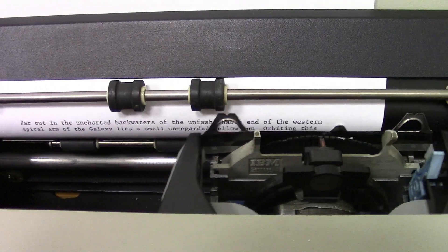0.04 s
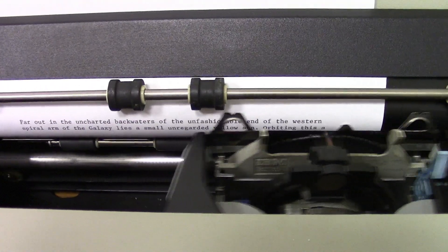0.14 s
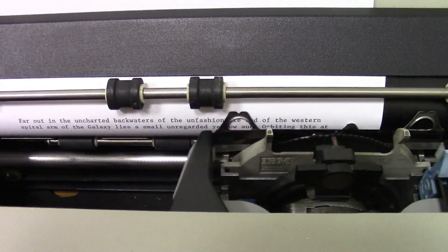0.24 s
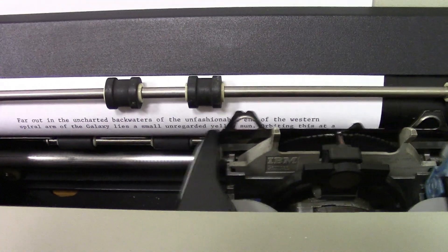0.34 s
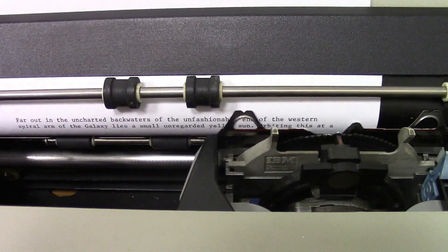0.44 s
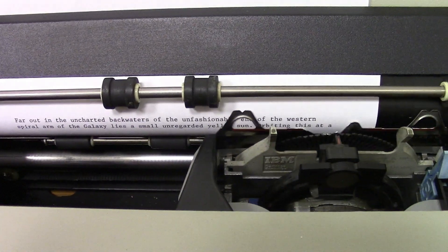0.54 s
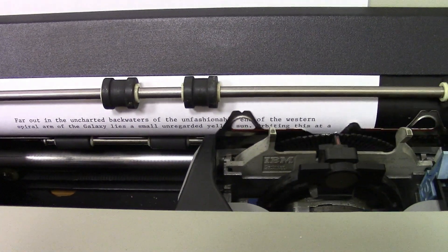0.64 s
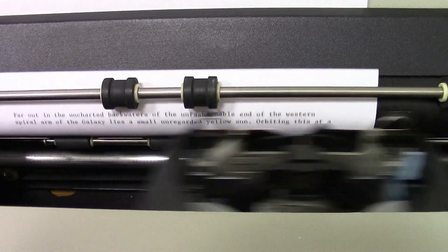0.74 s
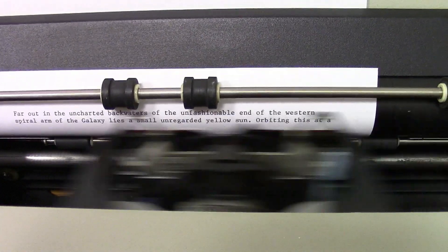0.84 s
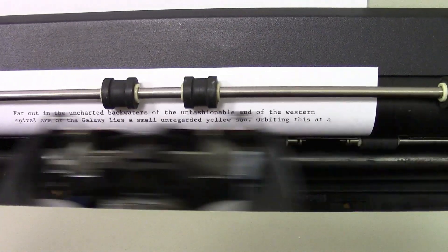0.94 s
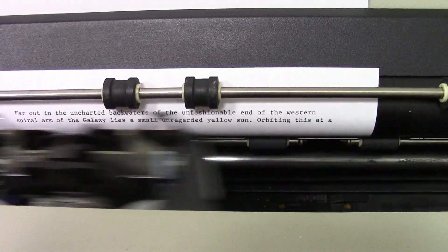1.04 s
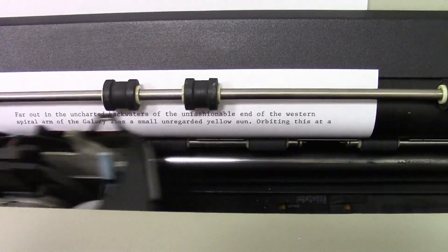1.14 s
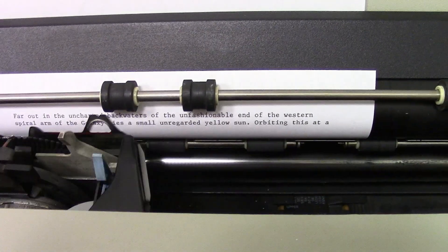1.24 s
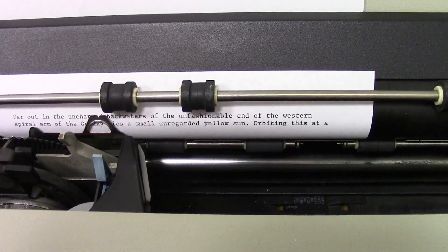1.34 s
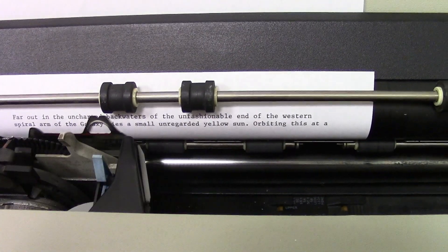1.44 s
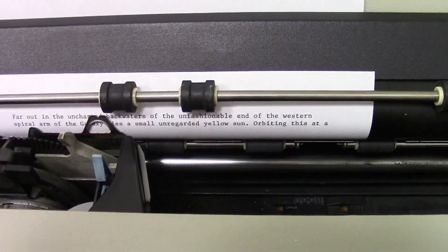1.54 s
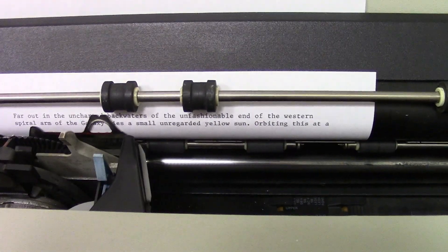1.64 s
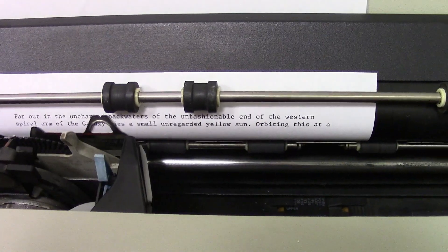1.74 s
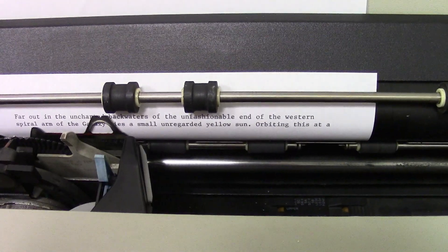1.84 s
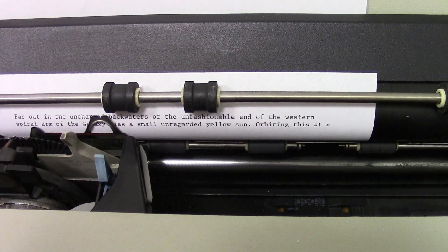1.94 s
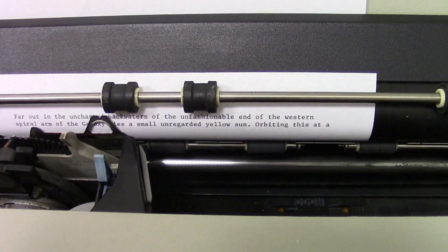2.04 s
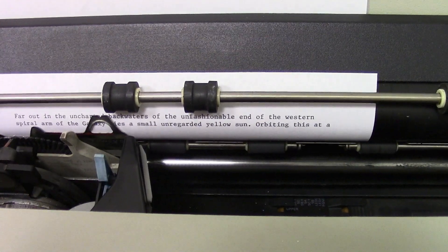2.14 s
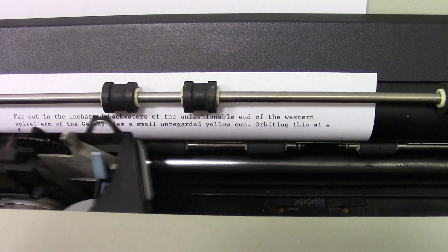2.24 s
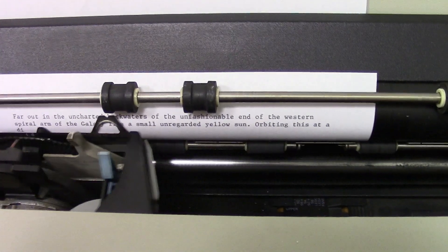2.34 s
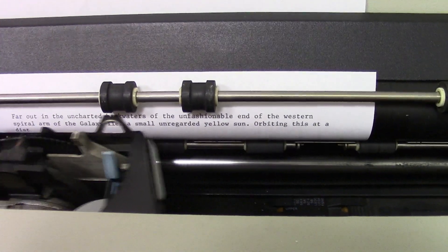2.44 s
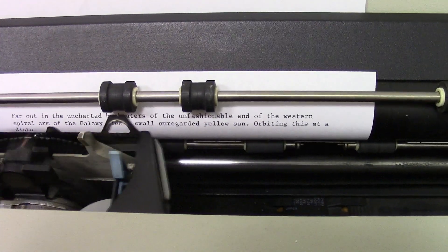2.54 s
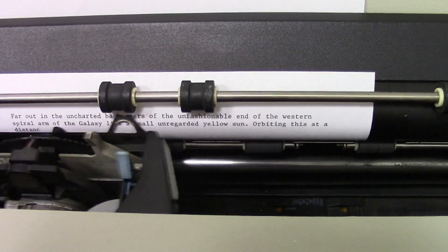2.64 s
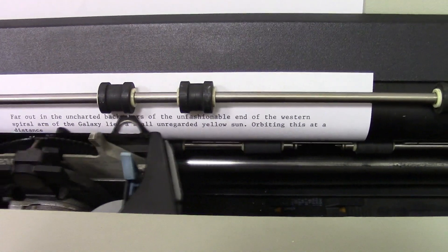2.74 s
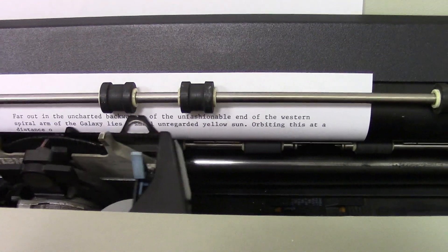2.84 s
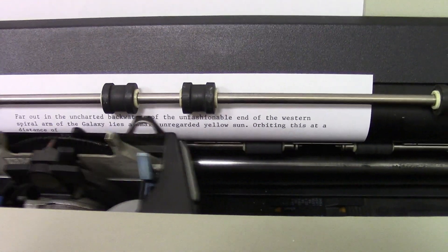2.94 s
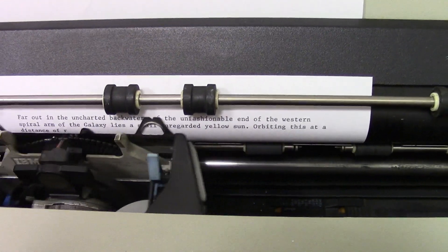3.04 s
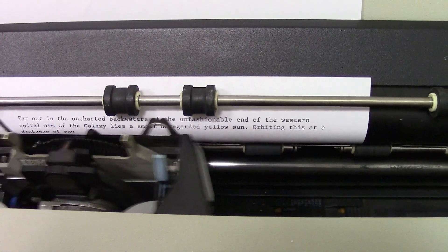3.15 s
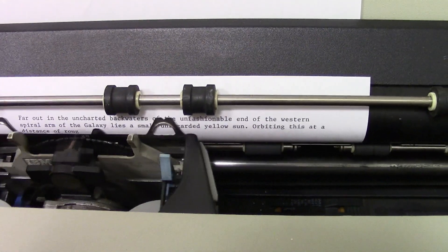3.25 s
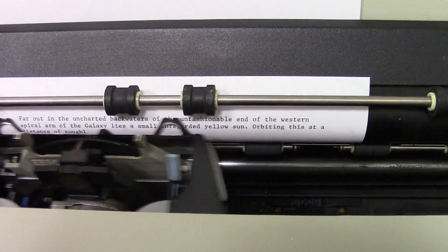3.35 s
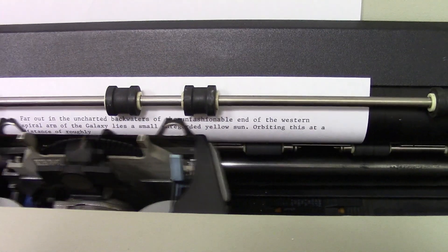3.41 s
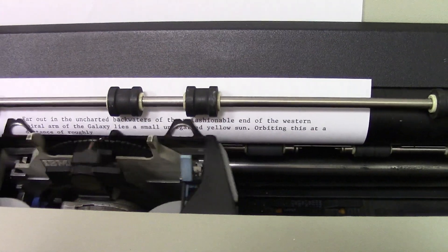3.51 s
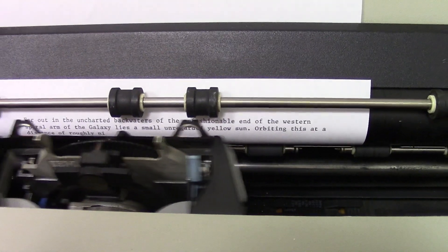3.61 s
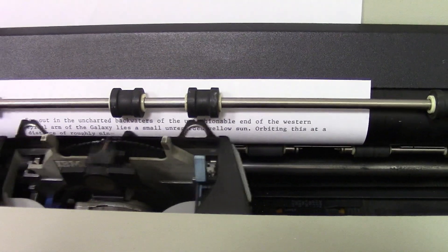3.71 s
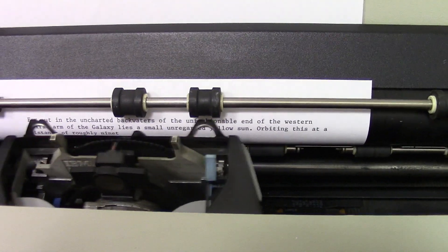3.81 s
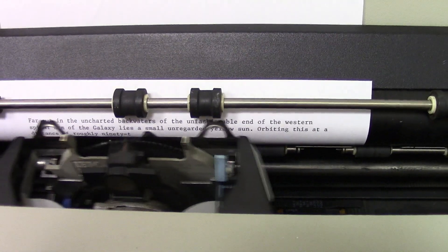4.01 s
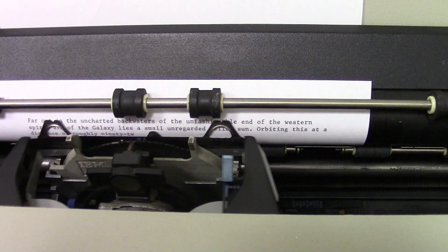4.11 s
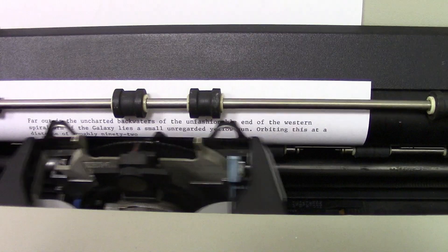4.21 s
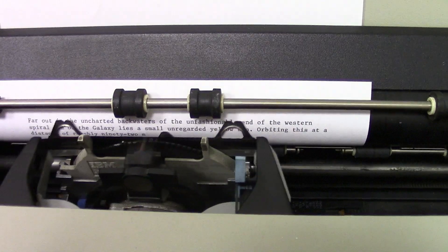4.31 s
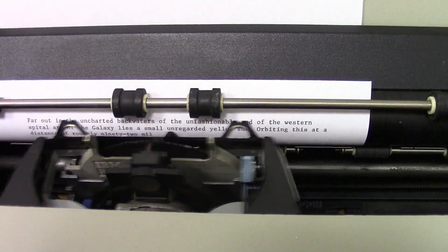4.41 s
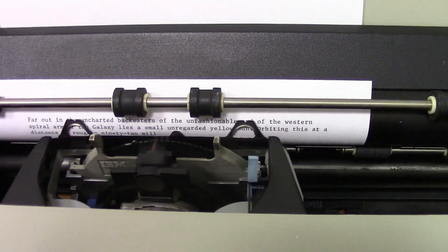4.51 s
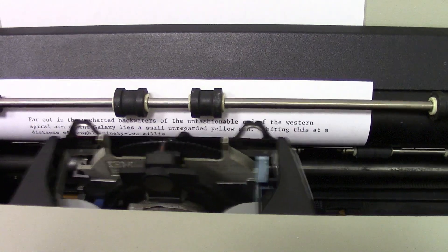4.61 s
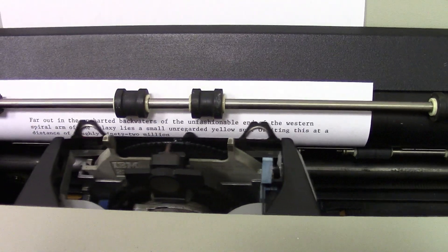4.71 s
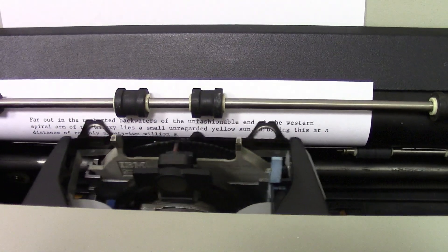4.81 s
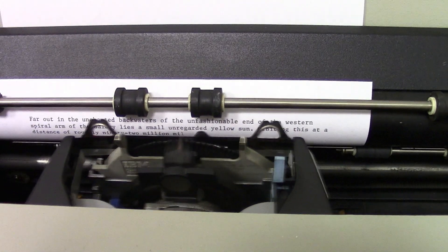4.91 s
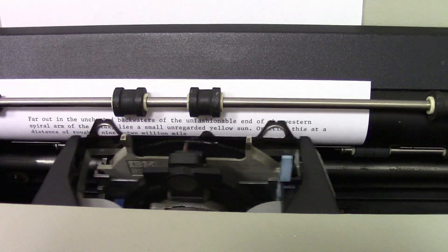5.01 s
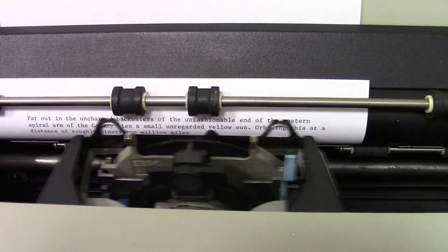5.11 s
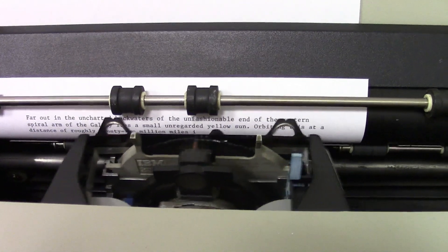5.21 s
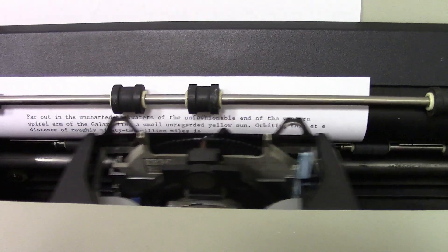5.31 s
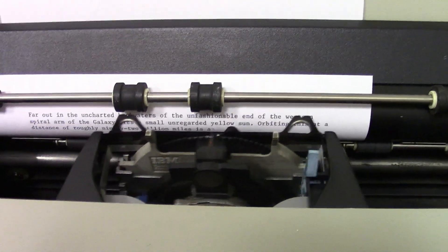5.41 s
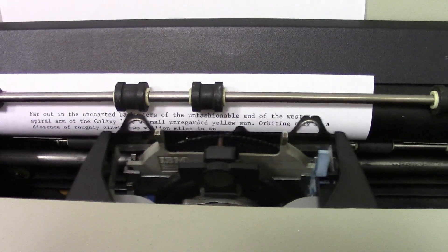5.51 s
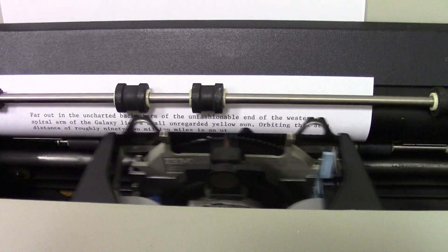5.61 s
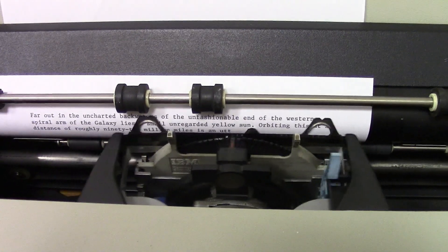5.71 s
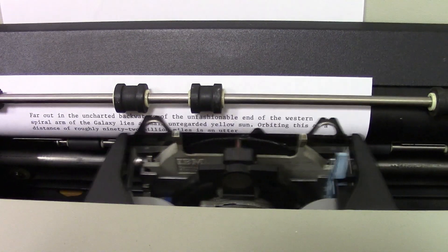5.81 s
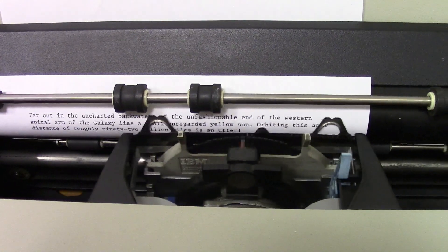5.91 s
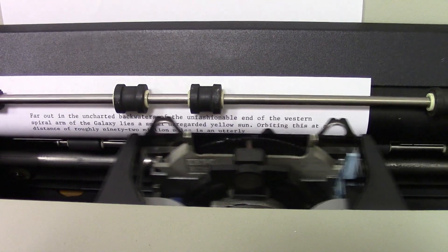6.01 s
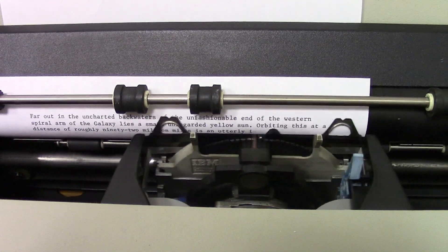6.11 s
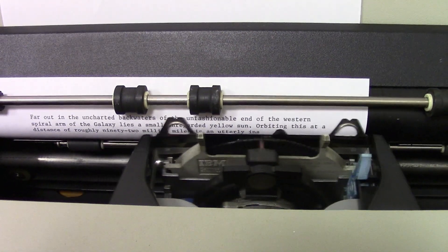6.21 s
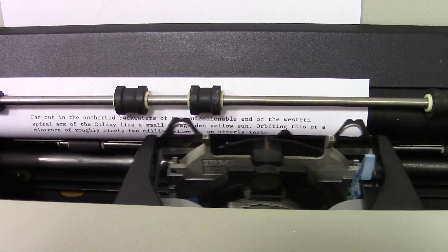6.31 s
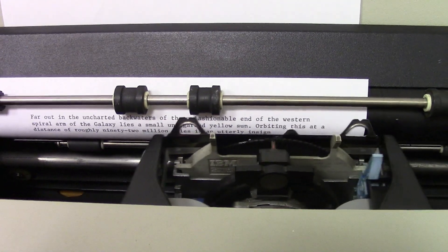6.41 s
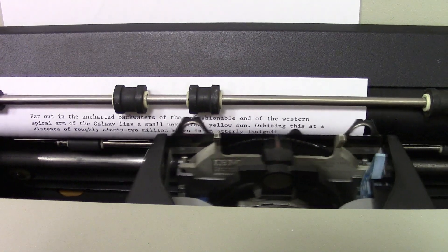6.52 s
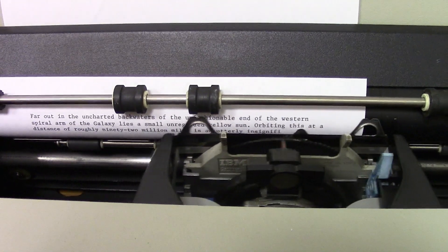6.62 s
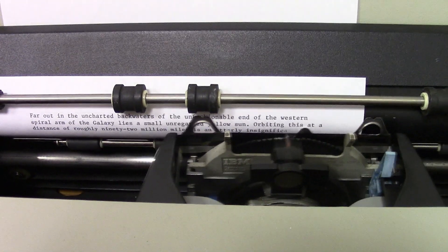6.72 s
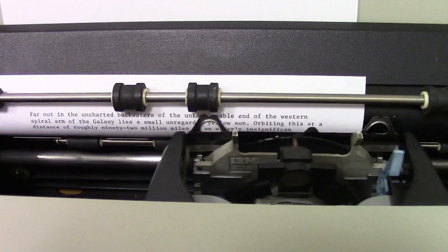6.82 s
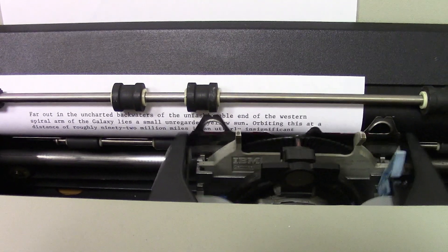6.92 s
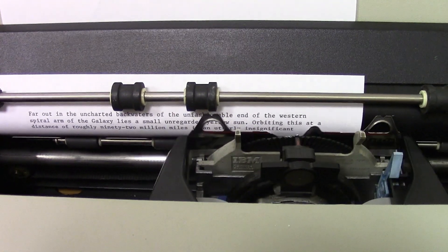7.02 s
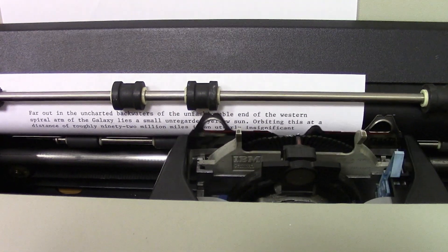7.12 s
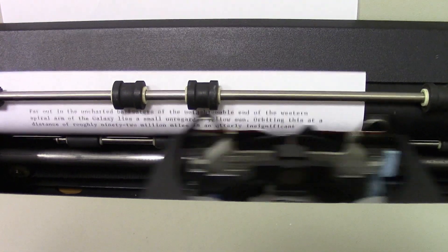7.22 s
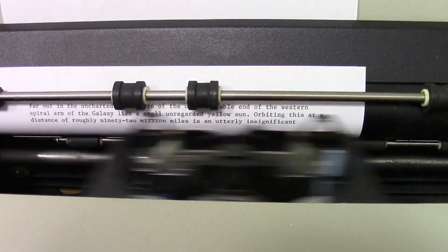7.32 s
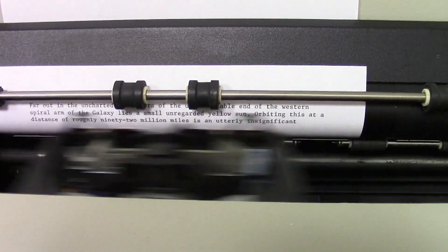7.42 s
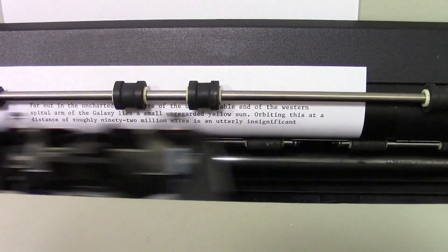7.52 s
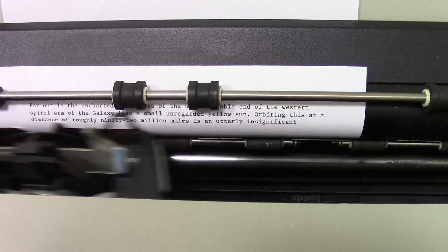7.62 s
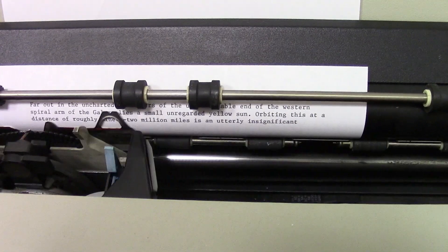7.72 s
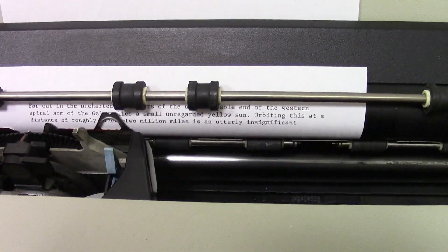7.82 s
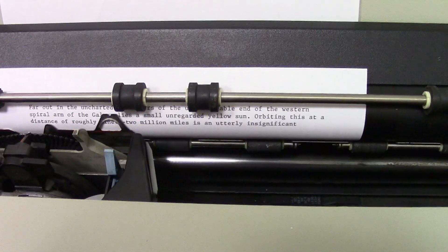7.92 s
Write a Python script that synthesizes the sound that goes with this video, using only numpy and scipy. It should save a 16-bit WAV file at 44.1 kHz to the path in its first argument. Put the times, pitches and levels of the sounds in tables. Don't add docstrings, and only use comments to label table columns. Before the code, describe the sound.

Close, hard machine-gun clacking of an electric typewriter at sixteen strikes a second, framed by two whirring carriage returns in a quiet room.

```python
import sys
import numpy as np
from scipy import signal
from scipy.fft import rfft, irfft, next_fast_len
from scipy.io import wavfile
from scipy.ndimage import uniform_filter1d, map_coordinates

SR = 44100
rng = np.random.default_rng(int(sys.argv[2]) if len(sys.argv) > 2 else 0)


def waveform_to_disk(signal):
    frames = np.transpose(np.atleast_2d(signal))
    scaled = np.clip(frames, -1, 1) * 32767
    samples = np.round(scaled).astype(np.int16)
    wavfile.write(sys.argv[1], SR, samples)


def linear_from_db(decibels):
    return 10 ** (np.asarray(decibels, float) / 20)


N = 350595

# first_blow_s, cycles_count, blow_db, whirr_db
TYPING_RUNS = [(0.0306, 1, -6, -32.5), (0.0972, 6, -5.5, -33), (2.3263, 1, -5, -31), (2.393, 1, -4.5, -31),
               (2.4591, 1, -5, -26), (2.5237, 7, -4.5, -33), (2.968, 6, -4.5, -33), (3.353, 2, -4, -35.5),
               (3.4971, 6, -4, -38), (3.8722, 2, -3, -32), (4.0116, 1, -11, -29.5),
               (4.0943, 1, -5.5, -34.5), (4.1601, 1, -4, -30), (4.226, 4, -5, -29.5),
               (4.4851, 2, -5, -32.5), (4.6184, 6, -4.5, -30), (5.002, 1, -5, -27.5),
               (5.0689, 4, -5.5, -30.5), (5.3226, 11, -4.5, -36), (6.028, 5, -5, -28.5),
               (6.3441, 4, -5.5, -34.5), (6.605, 1, -7, -36.5), (6.678, 1, -7.5, -32),
               (6.743, 4, -8, -32.5)]
# start_s, peak_db, whirr_db, shake_db, wheel_note_db
SPACES = [(0.0014, -25, -51, -25.5, 0), (0.1738, -21.5, -41, -26.5, -13), (0.3535, -23, -39, -26, -3),
          (0.4786, -32, -43, -40, -10), (0.5237, -32, -42.5, -41.5, -14), (2.2457, -25.5, -38, -49, -20),
          (2.2922, -28, -44.5, -45, -9), (2.8497, -29.5, -45, -35.5, -12), (3.0475, -26.5, -45, -28, -19),
          (3.5674, -32, -39.5, -31, -6), (4.3034, -21, -48, -28.5, -8.5), (4.811, -24, -38, -27, -14),
          (5.2044, -24.5, -41, -30, -15), (5.4006, -24.5, -41, -29.5, -16), (5.5848, -25, -42, -25.5, -14),
          (6.096, -23.5, -39, -29.5, 2), (6.999, -24, -40, -37.5, -3.5), (7.0416, -34, -43, -49, -10)]
# pitch_hz, left_margin_db, right_margin_db, t60_s
PLATEN_MODES = [(1491, -5.5, -9.5, 0.028), (1863, -2, -12.5, 0.018), (2335, -5.5, -8.5, 0.035),
                (2945, -16.5, -8.5, 0.06), (3282, -23, -24, 0.056), (3420, 2, -1, 0.014),
                (3827, -16, 6, 0.024), (3955, 7, -3, 0.017), (4213, 2.5, 0, 0.017), (4527, -7, -14, 0.023),
                (5340, -7, 3.5, 0.011), (5755, -7, 7, 0.016), (6004, 3, 8.5, 0.0093), (6370, -5, -6, 0.021),
                (7360, -23, -21, 0.045), (9046, -16, -19, 0.026), (9463, -29, -47, .012)]
# delay_s, level_db
CONTACTS = [
    (-.0028, -21),
    (0, 0),
    (.0005, -7),
    (.0012, -8),
    (.0019, -7),
    (.0043, -12),
    (.0125, -19),
]
# delay_s, level_db
ADVANCE_STEPS = [(.002, -12), (.0075, 7.5), (0.011, -2), (0.015, -10), (0.023, -3.5), (.029, 8),
                 (0.035, -6), (0.043, 3), (0.05, -1.5)]
# pitch_hz, width_hz, level_db
FRAME_MODES = [(90, 37, -11.5), (118.3, 31, -6.5), (226, 76, -10), (284.3, 46, -7.5), (331, 29.6, -8.5),
               (416.5, 25, -4.5), (507.5, 63, -5), (606, 133, -8), (760, 144, -11.5), (906, 38, -8.5),
               (1276, 570, -20.5)]
# pitch_hz, left_margin_db, midway_db, right_margin_db, delay_s, t60_s
ROCKING_MODES = [(109.4, -27, -31, -34, 0.01225, 0.25), (81.7, -34.5, -29.5, -36, 0.0112, 0.19),
                 (417, -24.5, -23.5, -19, 0.00996, 0.16), (500, -33.5, -36.5, -35.5, 0.01021, 0.22),
                 (288.2, -40, -37.5, -28.5, 0.033, 0.18)]
# pitch_hz, t60_s
PETAL_NOTE = (2900, 0.048)
# left_margin_db, midway_db, right_margin_db
SHAKE_ALONG_RAIL = (-24.5, -25.5, -26)
# blow_db, whirr_db, shake_db
LETTER_SCATTER = (.4, 1.5, 1.0)
# start_s, braking_s, full_step_rate_hz, dullness_db (a multiple)
RETURNS = [
    (0.741, 1.112, 652.6, -0.1),
    (7.267, 7.602, 646, 0.3),
]
# after_start_s, speed_share, whine_db, belt_db
RUN_UP = [(0, .39, -69, -55), (0.04, .56, -69, -47.5), (0.096, 0.764, -62, -52), (0.15, 0.909, -54, -58.5),
          (0.203, 1, -52.5, -53.5)]
# after_braking_s, speed_share, whine_db, belt_db
BRAKING = [(0, 1, -51.5, -50.5), (.066, .81, -47, -71), (.108, .56, -54, -50), (.165, .36, -52, -50),
           (0.245, 0.187, -53, -52)]
# multiple_count, level_db
MOTOR_PARTIALS = [(1, 1), (2, -25), (3, 0), (4, -24), (5, -9), (6, -10.5), (7, -33), (8, -9), (9, -14),
                  (10, -12), (11, -13), (13, -12.5)]
# multiple_count, level_db
BELT_PARTIALS = [(1, 17), (2, 6.5), (4, -5), (5, -4)]
# start_s, peak_db, tick_db, ring_db
JOLTS = [
    (0.755, -31, -22, -33.5),
    (0.858, -26, -27, -35.5),
    (1.242, -26, -31, -33),
    (1.27, -45, -22, -29.5),
    (1.384, -22.5, -25, -28.5),
    (7.282, -30.5, -14, -34),
    (7.393, -32, -18, -35),
    (7.751, -49, -25, -27),
    (7.868, -25.5, -22, -29.5),
]
# pitch_hz, level_db, t60_s
JOLT_MODES = [(286, -6.5, 0.44), (106, -11, 0.26), (206.4, 1, 0.08), (431.2, 0, 0.12)]
# pitch_hz, level_db
MACHINE_RESPONSE = [(30, -10), (60, -7), (85, 0), (130, 0), (175, -7), (230, 0)]
# pitch_hz, t60_s
ROOM_DECAY = [(100, 0.63), (500, 0.6), (3000, 0.42), (10000, 0.21)]
# pitch_hz, level_db (per Hz)
WHIRR_SPECTRUM = [(410, 4), (700, -2.5), (1180, -1.5), (2190, -3.5), (2800, 0), (3370, -3), (3990, -2.5),
                  (4730, -11.5), (5760, -9), (7690, -14.5), (8880, -13.5), (10100, -25), (12300, -30),
                  (16000, -70)]
AIR_SPECTRUM = [(12, -45), (20, 2), (63, -7), (85, -21), (126, -2), (153, -12.5), (1730, -23), (2110, -25),
                (2360, -21), (2630, -25), (3200, -24.5), (6800, -26.5), (15700, -31.5)]
TICK_SPECTRUM = [(1500, -11), (3000, 9), (6000, 5.0), (7500, -6.5), (9000, 3.0), (11000, -16.5),
                 (13000, -25), (16000, -59)]
CLINK_SPECTRUM = [(8000, -30), (10500, 6), (13500, -2), (16000, -16)]
SPARK_SPECTRUM = [(9500, -30), (11000, 7), (15500, -7), (16500, -10)]
FIZZ_SPECTRUM = [(7000, -30), (10000, 9), (13000, 0), (16000, -33)]
CLATTER_SPECTRUM = [(1500, -11), (2400, -4.0), (2900, 2), (3600, -4.0), (5500, -5.5), (7500, -12.5),
                    (9000, -8), (11000, -25.0), (16000, -53)]
SLIDING_SPECTRUM = [(700, 8), (2000, -7), (3500, 7), (5000, -7), (9000, -5), (12000, -30)]

CYCLE_S = 0.06236
BRIEF = np.arange(SR // 8) / SR


def unit(x):
    return x / np.sqrt(np.mean(x ** 2) + 1e-20)


def along(points, hz):
    f, v = np.transpose(points)
    return np.interp(np.log(hz + 1), np.log(f + 1), v)


def filtered(x, response):
    m = next_fast_len(N + SR // 2)
    return irfft(rfft(x, m) * response(np.fft.rfftfreq(m, 1 / SR)), m)[:N]


def noise(spectrum):
    return unit(filtered(rng.standard_normal(N), lambda hz: linear_from_db(along(spectrum, hz))))


def wobble(rate):
    knots = rng.standard_normal(int(N * rate / SR) + 4)
    return map_coordinates(knots, [np.arange(N) * rate / SR])


def pulses(s, gain):
    at = np.clip(np.round(np.ravel(s) * SR).astype(int), 0, N - 1)
    return np.bincount(at, np.ravel(gain), N)


def spread(pushes, shape):
    return signal.fftconvolve(pushes, shape)[:N]


def decay(rise_s, t60_s, t=BRIEF):
    return (1 - np.exp(-t / rise_s)) * linear_from_db(-60 * t / t60_s)


def sine(hz, t=BRIEF):
    return np.sin(2 * np.pi * hz * t)


def frame(hz):
    response = 0
    for k, (centre, width, db) in enumerate(FRAME_MODES):
        damping = 1j * hz * width
        response = response + (-1) ** k * linear_from_db(db) * damping / (centre * centre - hz * hz + damping)
    return response


def travel(s):
    return np.interp(s, [0, .5, 2.3, 7], [.8, .9, 0, 1])


def blows():
    cycles = []
    for first, count, db, whirr in TYPING_RUNS:
        for k in range(round(count)):
            cycles.append((first + k * CYCLE_S, db, whirr))
    s, db, whirr_db = np.transpose(cycles)
    until_space = np.transpose(SPACES)[0] - s[:, None]
    struck = ~((until_space > 0) & (until_space < CYCLE_S / 2)).any(axis=1)
    whirr_db = whirr_db - 2 * ~np.roll(struck, -1)
    shake_db = np.interp(travel(s), [0, .5, 1], SHAKE_ALONG_RAIL)
    rows = np.transpose([db, whirr_db, shake_db])
    rows = rows + LETTER_SCATTER * rng.standard_normal(rows.shape)
    return np.column_stack([s, rows])[struck]


def platen(typed):
    s, db = typed.T[:2]
    place = travel(s)
    delay, contact_db = np.transpose(CONTACTS)
    out = np.zeros(N)
    for hz, left_db, right_db, t60 in PLATEN_MODES:
        level_db = db + left_db + place * (right_db - left_db)
        level_db += 1.8 * rng.standard_normal(len(s))
        touch = contact_db + 2 * rng.standard_normal(len(delay))
        summed = abs(np.sum(linear_from_db(touch) * np.exp(2j * np.pi * hz * delay)))
        touch -= 20 * np.log10(summed + .4)
        pushes = pulses(s[:, None] + delay, linear_from_db(level_db[:, None] + touch - 6))
        soft_rise = 1 - np.exp(-BRIEF / 0.00033)
        out += spread(pushes, soft_rise * decay(0.00033, t60) * sine(hz))
    return out


def hammer_noise(typed):
    s, db = typed.T[:2]
    chance = rng.standard_normal((len(s), 2))
    stop_s = s + 0.0195 + 0.00042 * chance[:, 0]
    stop = pulses(stop_s, linear_from_db(db - 23.0 + 0.84 * chance[:, 1]))
    clink = linear_from_db(-21) * spread(stop, decay(.001, 0.03))
    tick = spread(stop, decay(0.00055, 0.051))
    tick += spread(pulses(s, linear_from_db(db - 18.5)), decay(0.00061, 0.032))
    spark = spread(pulses(s, linear_from_db(db - 40.5)), decay(.0005, 0.02))
    scatter = spread(pulses(s - .003, linear_from_db(db - 16.0)), decay(0.0032, 0.073))
    out = clink * noise(CLINK_SPECTRUM) + tick * noise(TICK_SPECTRUM)
    return out + spark * noise(SPARK_SPECTRUM) + scatter * noise(WHIRR_SPECTRUM)


def rocking(typed):
    s = typed[:, 0]
    skipped = s[:-1][np.round(np.diff(s) / CYCLE_S) == 2] + CYCLE_S
    steps = np.append(s, skipped)
    out = np.zeros(N)
    for hz, *rail_db, lag, t60 in ROCKING_MODES:
        level_db = np.interp(travel(steps), [0, .5, 1], rail_db) + 0.5 * rng.standard_normal(len(steps))
        shape = decay(0.0086, t60) * sine(hz) * (BRIEF < .115)
        out += spread(pulses(steps + lag, linear_from_db(level_db)), shape)
    return out


def hammer(typed):
    return platen(typed) + hammer_noise(typed) + rocking(typed)


def all_cycles(typed):
    return np.vstack([typed, np.array(SPACES)[:, :-1]]).T


def wheel(typed):
    s, _, whirr_db, _ = all_cycles(typed)
    spin = spread(pulses(s, linear_from_db(whirr_db)), np.exp(-((BRIEF - .028) / 0.027) ** 4))
    colour = noise(WHIRR_SPECTRUM) + linear_from_db(-44) * noise(FIZZ_SPECTRUM)
    whirr = spin * linear_from_db(2.2 * wobble(220)) * colour
    s, db, _, _, note_db = np.transpose(SPACES)
    clatter = spread(pulses(s - .006, linear_from_db(db - 3.5)), (BRIEF / 0.0039) * np.exp(-BRIEF / 0.0066))
    hz, t60 = PETAL_NOTE
    taps = s[:, None] + 0.0095 * rng.standard_normal((len(s), 4))
    tap_gain = linear_from_db((db + note_db)[:, None] - 4.5) * rng.standard_normal(taps.shape)
    note = spread(pulses(taps, tap_gain), linear_from_db(-60 * BRIEF / t60) * sine(hz))
    return whirr + clatter * noise(CLATTER_SPECTRUM) + note


def advance(typed):
    s, _, _, shake_db = all_cycles(typed)
    s = s - 0.011 * (np.arange(len(s)) >= len(typed))
    delay, step_db = np.transpose(ADVANCE_STEPS)
    chance = rng.standard_normal((len(s), len(delay), 2))
    step_s = s[:, None] + delay + 0.00021 * chance[..., 0]
    level_db = shake_db[:, None] + step_db + 1.2 * chance[..., 1] + 36.5
    shake = pulses(step_s, linear_from_db(level_db))
    swell = np.exp(-((BRIEF - .03) / 0.054) ** 4)
    for stretch in range(7):
        share = np.clip(1 - abs(s / 1.2 - stretch), 0, 1) ** .5
        pattern = swell * rng.standard_normal(len(BRIEF))
        shake += spread(pulses(s, share * linear_from_db(shake_db + 15.5)), pattern)
    loose = spread(pulses(s, linear_from_db(shake_db + 1.5)), swell) * rng.standard_normal(N)
    return filtered(shake + loose, frame)


def motor_tone(turn, slow, dull_db):
    fade = dull_db + 9 * slow
    wander = (.03 + 2 * slow) * wobble(90)
    out = np.zeros(N)
    for k, db in MOTOR_PARTIALS:
        level_db = db - fade * max(k - 3, 0) + 2.8 * wobble(70)
        out += linear_from_db(level_db) * np.sin(k * (turn + wander) + k * k)
    return out


def belt_tone(turn, slow):
    slip = 0.4 * wobble(60) + 4 * slow * wobble(80)
    out = np.zeros(N)
    for k, db in BELT_PARTIALS:
        out += linear_from_db(db - 27 * slow + 3.3 * wobble(60)) * np.sin(k * (.937 * turn + slip))
    return out


def carriage_return():
    t, out = np.arange(N) / SR, np.zeros(N)
    rumble = unit(filtered(rng.standard_normal(N), frame))
    hiss = noise(SLIDING_SPECTRUM)
    for start, brake, full_hz, dull_db in RETURNS:
        ramp = [(start + s, *row) for s, *row in RUN_UP] + [(brake + s, *row) for s, *row in BRAKING]
        s, *columns = np.transpose(ramp)
        speed, whine_db, belt_db = [np.interp(t, s, c) for c in columns]
        hz = full_hz * speed
        turn = 2 * np.pi * np.cumsum(hz) / SR
        slow = 1 - hz / hz.max()
        moving = linear_from_db(whine_db + 4.0) * motor_tone(turn, slow, dull_db)
        moving += linear_from_db(belt_db) * belt_tone(turn, slow)
        moving += linear_from_db(-43.5 + 3.5 * slow) * rumble + linear_from_db(-54.5 - 8 * slow) * hiss
        out += moving * np.interp(t, [s[0], s[0] + 0.024, s[-1] - .07, s[-1]], [0, 1, 1, 0])
        sway = linear_from_db(-41.5) * np.exp(-((t - start - 0.155) / 0.065) ** 2)
        out += sway * np.sin(2 * np.pi * 92 * t + 0.42 * wobble(28))
    return out


def jolts():
    s, db, tick_db, ring_db = np.transpose(JOLTS)
    jolt = spread(pulses(s, linear_from_db(db + 13.0)), decay(0.0031, 0.19)) * rng.standard_normal(N)
    tick = spread(pulses(s, linear_from_db(db + tick_db)), decay(0.0028, 0.12)) * noise(SLIDING_SPECTRUM)
    t = np.arange(SR // 2) / SR
    ring = sum(linear_from_db(level) * decay(0.0029, t60, t) * sine(hz, t) for hz, level, t60 in JOLT_MODES)
    return filtered(jolt, frame) + tick + spread(pulses(s, linear_from_db(ring_db)), ring)


def machine_tone(machine):
    return filtered(machine, lambda hz: linear_from_db(along(MACHINE_RESPONSE, hz)))


def room(x):
    out = np.zeros(N)
    places = rng.integers(0, 8, N // 2600 + 1).repeat(2600)[:N]
    for place in range(8):
        hz, t, z = signal.stft(rng.standard_normal(SR // 2), SR, nperseg=256)
        fading = z * linear_from_db(-60 * t / along(ROOM_DECAY, hz)[:, None])
        tail = signal.istft(fading, SR, nperseg=256)[1]
        share = uniform_filter1d(1.0 * (places == place), size=300)
        delayed = np.pad(x * share, (250, 0))
        out += spread(delayed, tail / np.linalg.norm(tail))
    return out


def still_air(machine):
    busy = np.clip(uniform_filter1d(abs(machine), size=SR // 8) / linear_from_db(-28), 0, 1)
    air = linear_from_db(-51) * noise(AIR_SPECTRUM)
    treble = filtered(air, lambda hz: hz > 1000)
    return air - treble * (1 - linear_from_db(-5 * busy))


def scene():
    typed = blows()
    machine = machine_tone(hammer(typed) + wheel(typed) + advance(typed) + carriage_return() + jolts())
    return (machine + linear_from_db(-13.0) * room(machine) + still_air(machine))[None]


def top_cut(x):
    return signal.sosfilt(signal.butter(12, 16500, fs=SR, output="sos"), x)


def record(dry):
    top, band_hz = 1.2, 15900
    rounded = dry[0] / (1 + (dry[0] / top) ** 2) ** .5
    limited = filtered(rounded, lambda hz: linear_from_db(-30 * (hz > band_hz)))
    return top_cut(limited[None])


dry = scene()
out = record(dry)
waveform_to_disk(out)
```